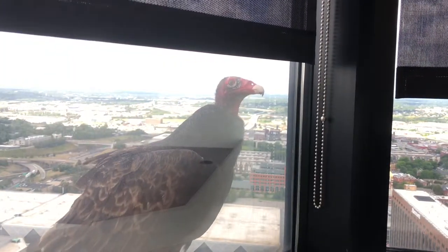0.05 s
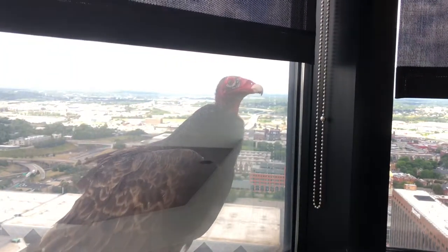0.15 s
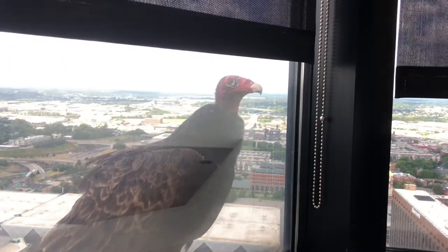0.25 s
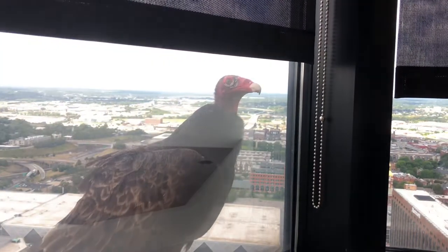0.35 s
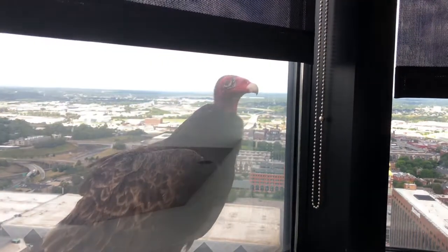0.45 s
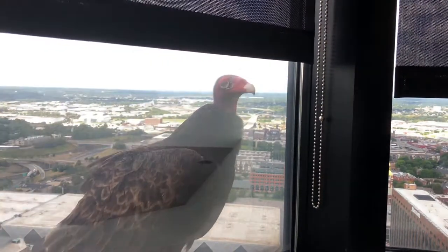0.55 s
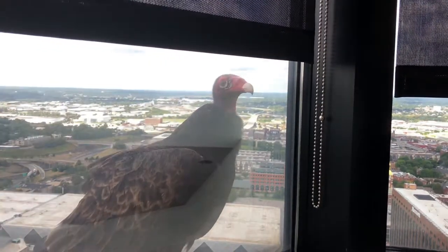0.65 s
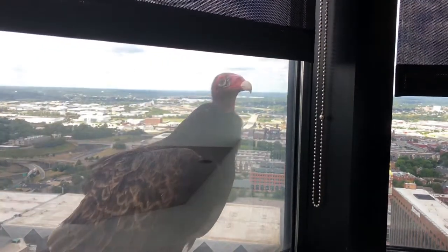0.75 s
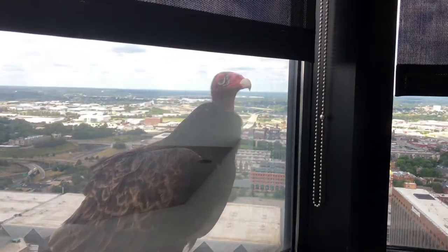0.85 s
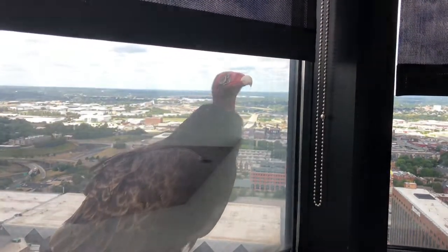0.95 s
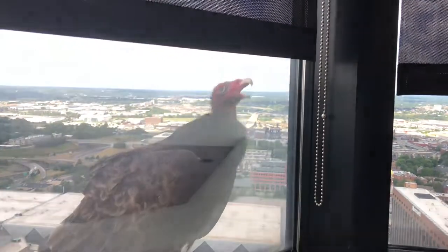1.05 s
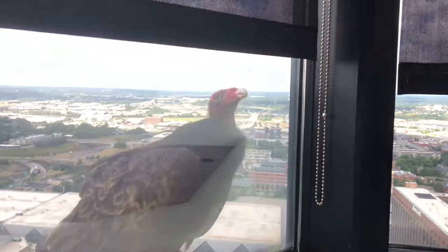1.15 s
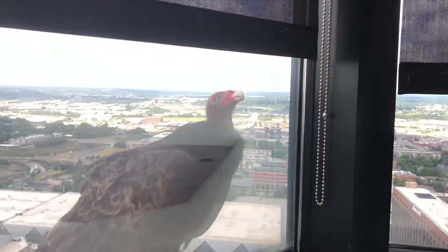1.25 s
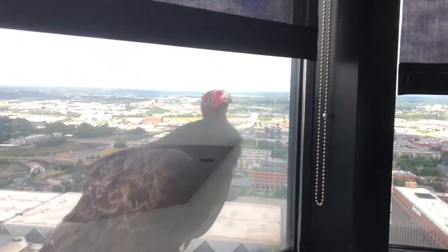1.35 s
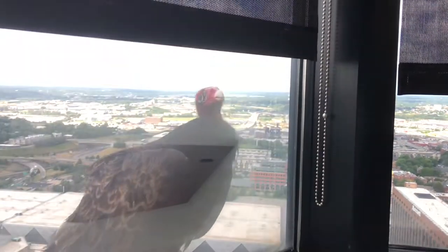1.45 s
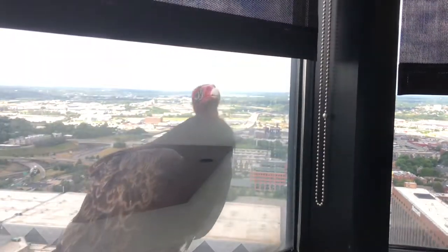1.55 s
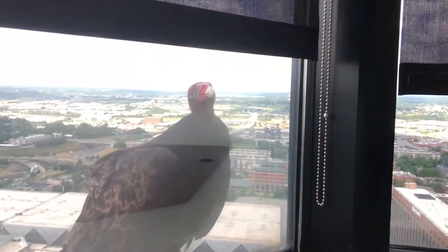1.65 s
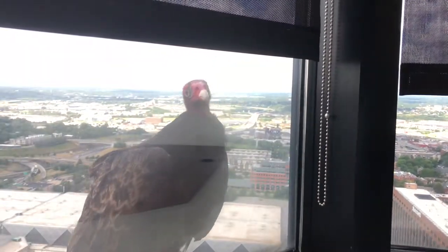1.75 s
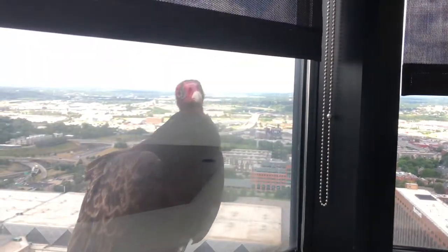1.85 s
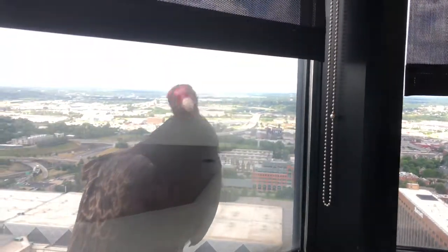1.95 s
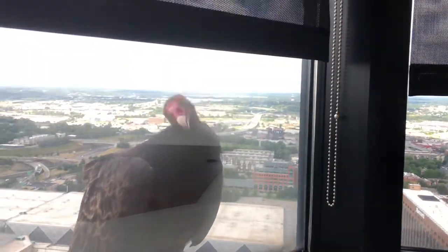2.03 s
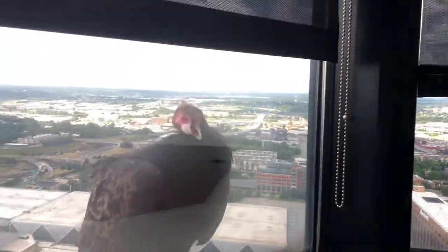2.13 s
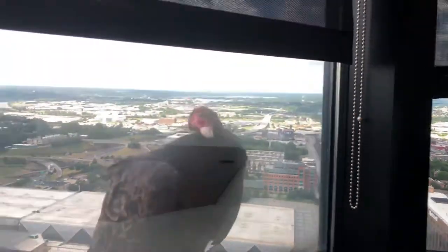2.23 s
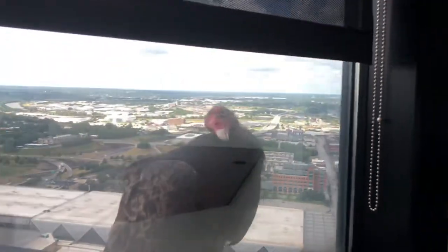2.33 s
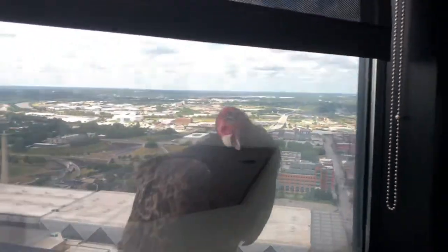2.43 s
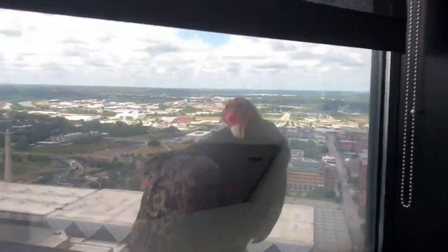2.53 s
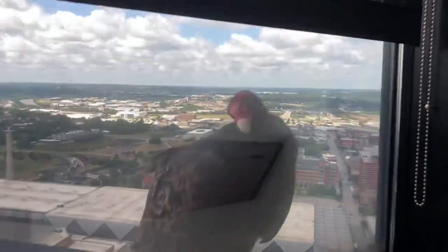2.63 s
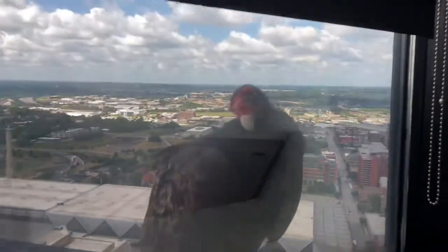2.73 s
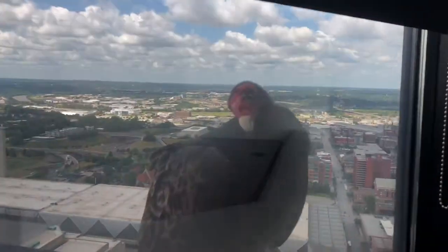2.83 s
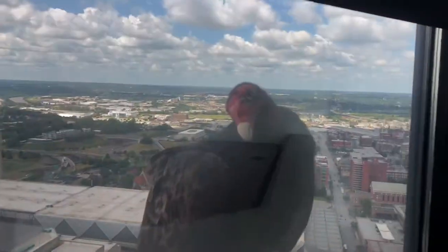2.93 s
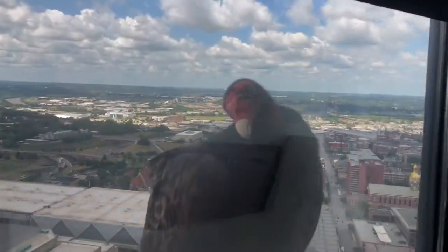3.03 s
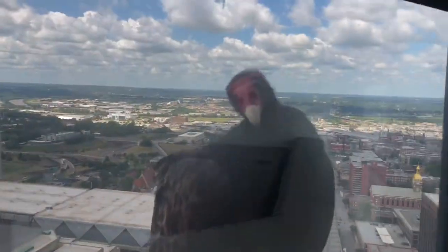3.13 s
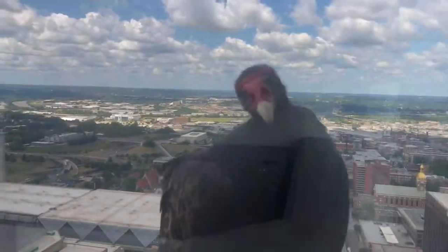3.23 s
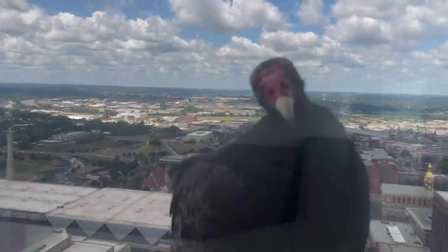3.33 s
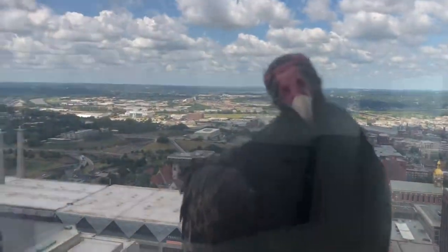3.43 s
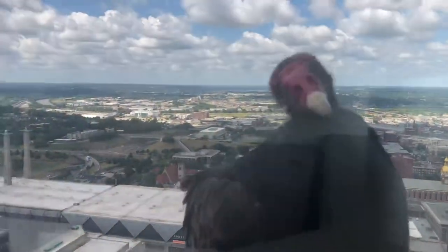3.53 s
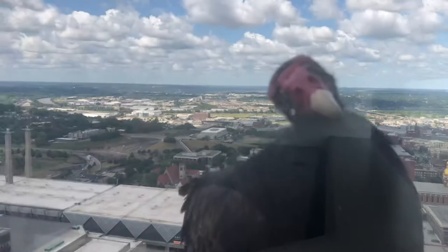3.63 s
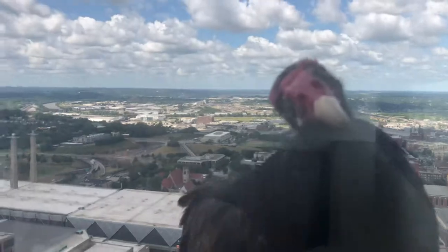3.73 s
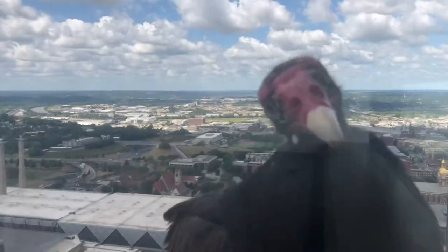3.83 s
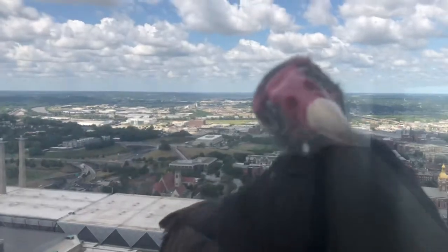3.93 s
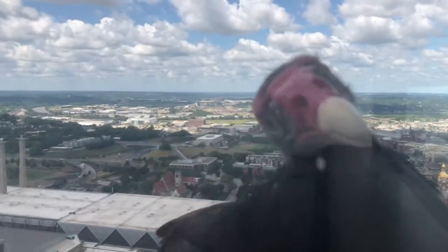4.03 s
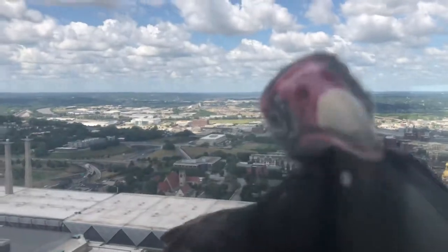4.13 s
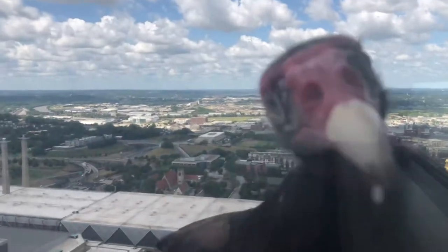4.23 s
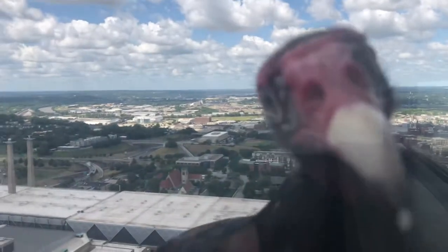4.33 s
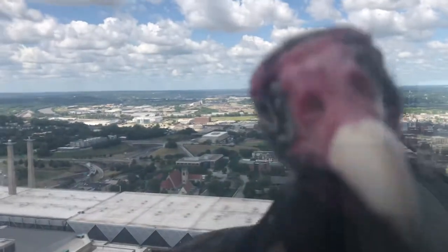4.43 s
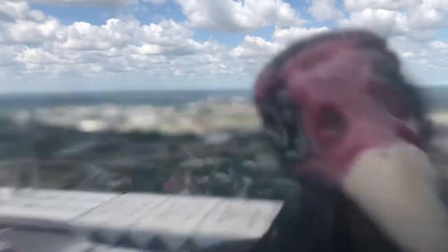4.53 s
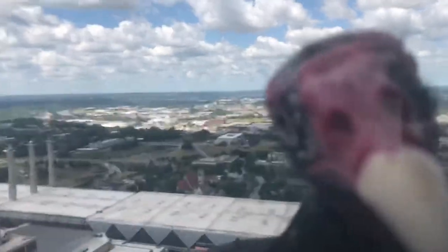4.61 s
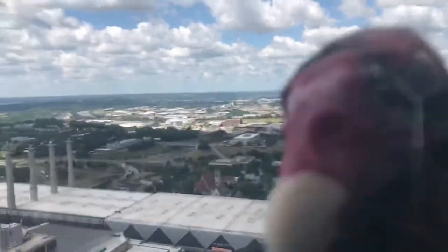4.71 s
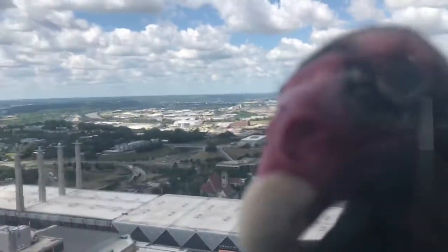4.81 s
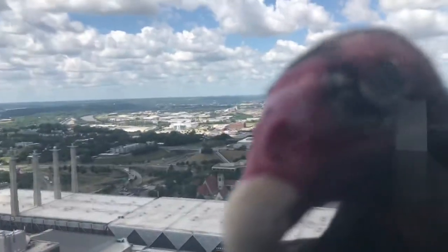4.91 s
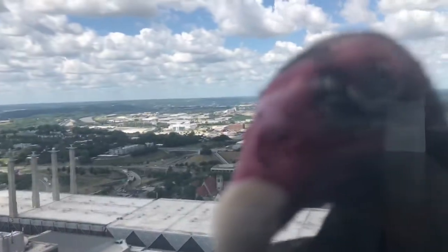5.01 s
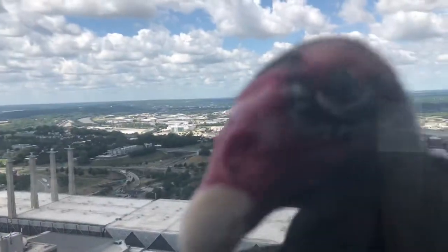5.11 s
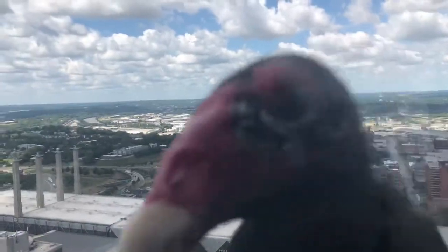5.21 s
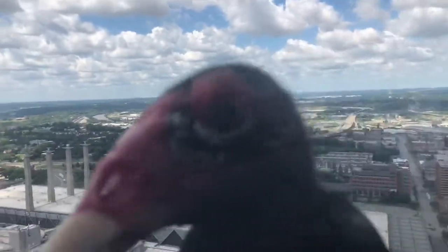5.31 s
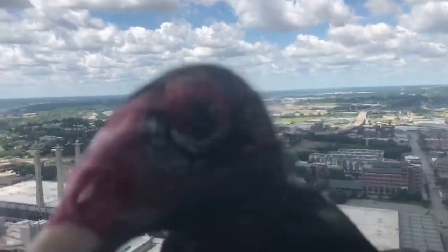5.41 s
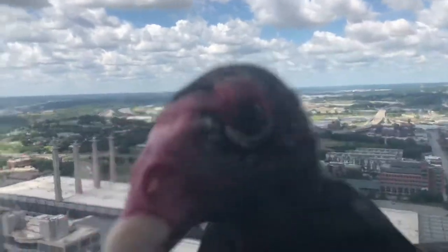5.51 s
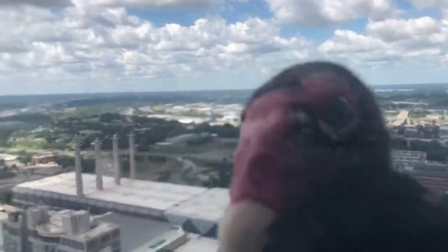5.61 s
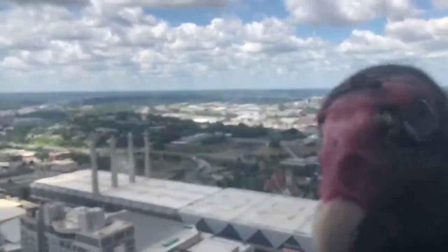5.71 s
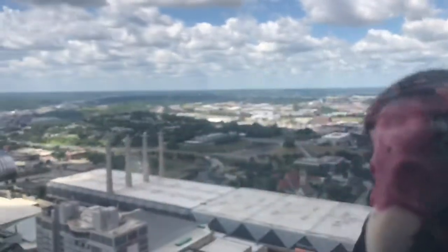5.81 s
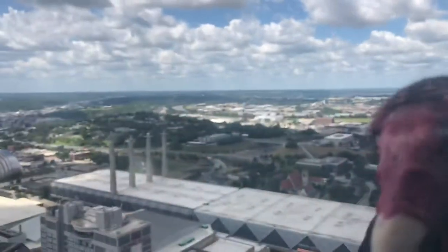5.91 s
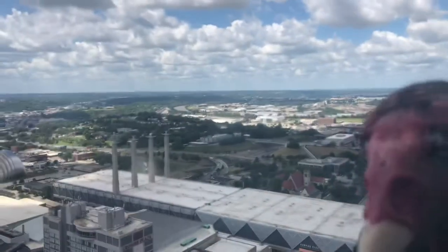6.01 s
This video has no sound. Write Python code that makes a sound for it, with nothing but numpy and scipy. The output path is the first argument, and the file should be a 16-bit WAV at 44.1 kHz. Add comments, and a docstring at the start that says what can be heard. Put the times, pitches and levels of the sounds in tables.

```python
"""A vulture on a ledge taps its beak on a large window, heard from just inside a quiet room.
Ventilation noise, a wavering fan tone and a faint whine run throughout, with a thin hiss that comes and goes.
Dull taps begin, and bright scuffs (both noise cracks with decaying rings) and hollow clacks with swelling modes
soon mingle with them. Late on, one hard knock by the microphone sweeps down in pitch, chatters in bright
noise bursts and rings."""
import sys
import numpy as np
from scipy import signal
from scipy.fft import irfft, next_fast_len
from scipy.io import wavfile
from scipy.ndimage import uniform_filter1d

SR = 44100
rng = np.random.default_rng(int(sys.argv[2]) if len(sys.argv) > 2 else 0)


def to_wav(sig):
    """Store sig (one row per channel, or 1-D mono) as 16-bit WAV at the path in sys.argv[1].

    Samples outside -1..1 are clipped; the rate is SR.
    """
    pcm = np.clip(np.atleast_2d(sig), -1, 1) * 32767
    pcm = np.round(pcm).astype(np.int16)
    wavfile.write(sys.argv[1], SR, pcm.T)  # frames by channels


N = 267246

# approach of the microphone to the window: [t/s, nearness 0-1]
NEARNESS = [(0, 0), (1.7, 0), (2.4, 0.68), (4.2, 0.9), (6.06, 0.98)]
# spectral shape of the ventilation noise: [f/Hz, relative density/dB per Hz]
AIR_COLOUR = [(15, -57.5), (25, -31), (64, -11), (107, -9.5), (140, -12.5), (164, -3.5), (297, -14),
              (331, -18), (445, -20.5), (495, -23.5), (567, -24.5), (1410, -38), (2490, -43.5),
              (3340, -46.5), (15500, -57.5)]
# level of the fan tone, uneven across the room: [t/s, level/dB]
FAN_LEVEL = [(0.0, -60.5), (2.75, -53.5), (3.48, -59), (4.47, -47.5), (4.98, -61), (5.33, -46.5),
             (6.06, -52.5)]
# stretches where the thin hiss stands out: [start t/s, end t/s]
HISS_SPANS = [(0.073, 0.913), (1.782, 2.815), (3.305, 4.707), (5.066, 5.246), (5.421, 5.693)]
# spectral shape of the thin hiss: [f/Hz, relative density/dB per Hz]
HISS_COLOUR = [(880, -7.5), (1500, -1.5), (1810, -3.5), (1930, -3), (3060, -3), (4350, -3), (15500, -12)]
# spectral shape of the whisper of air by the window: [f/Hz, relative level/dB]
WHISPER_COLOUR = [(300, -25.5), (420, -4), (455, 7.5), (500, -6.5), (800, -6), (1500, -3.5), (2450, 4.5),
                  (2900, -18.5), (8000, -39)]
# resonances and dips of the pane, applied in part to the taps, scuffs, clacks and the knock's tail: [f/Hz,
# width/Hz, lift/dB]
PANE = [(215, 31, 15.5), (383, 8, 2.5), (520, 6.7, 4), (572, 14, 10), (746.4, 16, 1.5), (1044, 120, 3.5),
        (1329, 18, 6.5), (1560, 31, -3), (1770, 27, 7.5), (2416, 46, 15), (2650, 27, -4.5), (3250, 56, 4.5),
        (5150, 55, 8.5)]
# decay of pane and room: [f/Hz, time to fall 60 dB/s]
DECAY = [(100, 0.98), (300, 0.92), (600, 0.5), (1200, 0.33), (2500, 0.26), (5000, 0.37), (12000, 0.31)]
# dull taps: [t/s, relative level/dB, tilt/dB per octave, favoured resonance f/Hz, rise time constant/s]
TAPS = [ (1.095, -29, -2.8, 890, 0.0042), (1.132, -34.5, -3, 602, 0.0067), (1.985, -42.5, -3, 1090, 0.003),
        (2.121, -32.5, 0.2, 556, 0.0053), (2.533, -29.5, 0.7, 2150, 0.0015),
        (3.541, -52, 3.5, 1100, 0.0033), (3.626, -37.5, -2, 2310, 0.0029),
        (5.116, -54.5, -9.5, 185, 0.0016), ]
# spectral shape of a tap before its tilt: [f/Hz, relative level/dB]
TAP_COLOUR = [(60, -13), (180, 4), (260, 6), (400, 0.5), (600, 2.5), (1200, 0), (2200, -3), (3000, -11),
              (4200, -20.5), (9000, -44), (16000, -45)]
# scuffs and brushes: [t/s, relative level/dB, tilt/dB per octave, favoured resonance f/Hz, rise time constant/s]
SCUFFS = [ (1.824, -48.5, -4, 774, .011), (2.214, -33.5, -1.5, 716, 0.048), (2.303, -41.5, 0, 1320, 0.011),
          (2.356, -43, 1.5, 1730, 0.0091), (3.004, -47.5, 4, 2820, 0.035), (3.335, -43.5, -1.3, 890, 0.011),
          (3.375, -44.5, -0.5, 3770, 0.0037), (3.462, -42.5, -2, 705, .008),
          (3.686, -40, 2.5, 4070, 0.0076), (3.813, -30.5, -0.5, 777, 0.0044),
          (3.938, -43, -3.5, 2400, 0.0023), (4.117, -37, -0.6, 780, 0.0061), (4.206, -51, 4, 2400, 0.0036),
          (4.514, -39, -0.6, 2430, 0.0088), (4.750, -27, 0, 750, 0.0038), (4.954, -39, 0, 4100, .014),
          (5.414, -43.5, -2, 2270, 0.013), ]
# spectral shape of a scuff before its tilt: [f/Hz, relative level/dB]
SCUFF_COLOUR = [(60, -11), (250, 2.5), (700, 2.5), (2000, 0.5), (4200, -4.5), (9000, -17), (16000, -26)]
# hollow clacks: [t/s, relative level/dB, further level of the modes/dB]
CLACKS = [(2.357, -42, -7), (2.954, -47, -4.5), (4.459, -39.5, -5.5), (4.919, -44, -4), (5.386, -53.5, 1)]
# spectral shape of the clack's noise: [f/Hz, relative level/dB]
CLACK_COLOUR = [(200, -37.5), (650, 0.5), (1050, -5.5), (1250, 3), (1700, 3.5), (2100, -2), (2650, -21),
                (3100, -9), (4500, -23.5), (6500, -37.5), (15000, -53.5)]
# swelling modes of a clack: [f/Hz, relative level/dB, t of greatest strength/s]
CLACK_MODES = [(599, -5, 0.0092), (1260, -4, 0.015), (1600, 0, 0.0053), (1523, -1.5, 0.028),
               (3080, -15, 0.016)]
# pitch of the bending wave as it arrives: [t after the blow/s, f/Hz]
SWEEP = [(0, 6200), (.0001, 3500), (.00045, 1100), (.001, 790), (.0026, 560), (.0035, 250), (.009, 170),
         (.02, 92), (.05, 60)]
# spectral shape of the knock's diffuse tail: [f/Hz, relative level/dB]
KNOCK_TAIL_COLOUR = [(35, -25.5), (70, -12.5), (160, -9), (260, -10), (390, 1), (520, -9), (750, -2.5),
                     (1150, -9), (1700, -5.5), (3200, -11.5), (4500, -13.5), (7000, -26), (15500, -35.5)]
# modes that only the hard knock sets ringing: [f/Hz, relative level/dB, time to fall 60 dB/s]
KNOCK_MODES = [(383, 1, 0.33), (455, -6.5, .8), (617, 3, 0.22), (730, 7.5, .25), (1016, -17, .6),
               (1510, -6.5, 0.4), (2490, -10, .45), (2790, -15, 0.4), (3220, -10.5, 0.39),
               (5238, -14, 0.32)]
# rebounds after the hard knock: [t/s]
CHATTER_TIMES = [4.6219, 4.6305, 4.6404, 4.6515]
# spectral shape of the rebounds: [f/Hz, relative level/dB]
CHATTER_COLOUR = [(1000, -22), (3000, -9), (6000, -3), (9000, -12), (12000, -7), (14500, 1), (15600, 0),
                  (16500, -8), (17500, -25)]

KNOCK_S = 4.6159  # instant of the hard knock


def gain_of(db):
    """Logarithmic level: 20 dB is a factor of ten in amplitude."""
    return 10 ** (np.asarray(db) / 20)


def evened(x):
    """Normalisation to unit root-mean-square amplitude."""
    return x / np.sqrt(np.mean(x ** 2) + 1e-20)


def read(points, hz):
    """Linear interpolation of a table along a logarithmic frequency axis."""
    f, value = np.transpose(points)
    return np.interp(np.log(hz + 1), np.log(f + 1), value)


def add(mix, s, sound):
    """Superposition: a sound starting at s seconds sums into the mix."""
    part = mix[round(s * SR):][:len(sound)]
    part += sound[:len(part)]


def noise(colour, size, pane=0):
    """Noise as dense partials of random phase; pane scales how strongly the glass shapes their spectrum."""
    hz = np.fft.rfftfreq(size, 1 / SR)
    lift = sum(db / (1 + (2 * (hz - f) / width) ** 2) for f, width, db in PANE)
    height = gain_of(read(colour, hz) + pane * lift)
    phase = np.exp(2j * np.pi * rng.random(len(hz)))
    return irfft(height * phase, size) * np.sqrt(size)


def steady_noise(colour):
    """Stationary noise of unit level and a given spectrum over the whole scene."""
    return evened(noise(colour, size=next_fast_len(N))[:N])


def approach(far_db, gained_db):
    """Proximity: the gain of a background sound grows as the microphone nears the window."""
    nearness = np.interp(np.arange(N) / SR, *np.transpose(NEARNESS))
    return gain_of(far_db + gained_db * nearness)


def ventilation(fan_hz=136.3, waver=0.16, waver_hz=2):
    """Broadband flow noise with a fan tone whose amplitude and phase waver by slow random modulation."""
    t = np.arange(N) / SR
    air = steady_noise(AIR_COLOUR) * approach(far_db=-52, gained_db=3)
    drift = steady_noise([(waver_hz, 0), (4 * waver_hz, -40), (20 * waver_hz, -140)])
    modulation = 1 + waver * signal.hilbert(drift) / np.sqrt(2)
    tone = (modulation * np.exp(2j * np.pi * fan_hz * t)).real
    tone_level = gain_of(np.interp(t, *np.transpose(FAN_LEVEL)))
    return air + np.sqrt(2) * tone * tone_level


def hiss(hiss_db=-65, whine_hz=15235, whine_db=-91):
    """Gated noise makes a hiss that comes and goes, over a whisper of air and a sinusoidal electrical whine."""
    t = np.arange(N) / SR
    level = gain_of(hiss_db) * sum((t > start) & (t < end) for start, end in HISS_SPANS)
    smooth_level = uniform_filter1d(level, size=300)
    thin = smooth_level * steady_noise(HISS_COLOUR)
    whisper = approach(far_db=-89, gained_db=19) * steady_noise(WHISPER_COLOUR)
    whine = gain_of(whine_db) * np.sin(2 * np.pi * whine_hz * t)
    return thin + whisper + whine


def die_away(x):
    """Exponential decay: every band fades at the rate of pane and room."""
    hz, t, z = signal.stft(x, SR, nperseg=256)
    z = z * gain_of(-60 * t / read(DECAY, hz)[:, None])
    return signal.istft(z, SR, nperseg=256)[1][:len(x)]


def clumps(depth_db):
    """Echo density: echoes bunch unevenly, a few milliseconds at a time."""
    fluctuation = uniform_filter1d(rng.standard_normal(SR), size=110)
    return gain_of(depth_db * evened(fluctuation))


def strike(colour, level_db, tilt_db, spot_hz, rise_s, crack=6.0, crack_hz=2400, favour=2.4, clump_db=1.16):
    """Impact excitation: a brief crack and diffuse ring, tilted in spectrum, plus the struck spot's own note."""
    t = np.arange(SR) / SR
    tilted = [(hz, db + tilt_db * np.log2(hz / 1000)) for hz, db in colour]  # pivots at 1 kHz
    ring = noise(tilted, size=SR, pane=0.41)
    spot = signal.lfilter(*signal.iirpeak(spot_hz, 12, SR), ring) * np.exp(-t / 0.06)
    # the instant of contact is brightest
    treble = signal.lfilter(*signal.butter(2, crack_hz, "high", fs=SR), ring)
    edge = treble * np.exp(-t / 0.0028)
    blow = (1 - np.exp(-t / rise_s)) * (1 + 0.49 * np.exp(-t / 0.0046))  # onset with early direct sound
    body = die_away(ring + favour * spot + crack * edge)
    return gain_of(level_db) * body * clumps(clump_db) * blow


def taps(level_db=-1):
    """Impulsive excitation: quick, dull blows ring the pane and the room."""
    out = np.zeros(N)
    for s, db, tilt_db, spot_hz, rise_s in TAPS:
        tap = strike(TAP_COLOUR, level_db + db, tilt_db, spot_hz, rise_s,
                     crack=6.6, crack_hz=1810, favour=2.9, clump_db=0.2)
        add(out, s, tap)
    return out


def scuffs(level_db=-1):
    """Glancing contact: most touches swell more slowly than taps, and their spectrum holds more treble."""
    out = np.zeros(N)
    for s, db, tilt_db, spot_hz, rise_s in SCUFFS:
        add(out, s, strike(SCUFF_COLOUR, level_db + db, tilt_db, spot_hz, rise_s))
    return out


def clacks(wash_db=-2, modes_db=-1, fade_s=0.14, snap=0.096, snap_s=0.0026, clump_db=3.0, swell=3.2):
    """Modal superposition: a decaying noise click joins modes that each swell to a peak, then fade."""
    out, t = np.zeros(N), np.arange(SR) / SR
    modes = np.zeros(SR)
    for hz, db, peak_s in CLACK_MODES:
        envelope = (t / peak_s * np.exp(1 - t / peak_s)) ** swell
        modes += gain_of(db) * np.sin(2 * np.pi * hz * t) * envelope
    for s, db, ring_db in CLACKS:
        wash = die_away(evened(noise(CLACK_COLOUR, size=SR, pane=0.82)))
        wash *= np.exp(-t / fade_s) * (1 + snap * np.exp(-t / snap_s))
        ring = gain_of(modes_db + ring_db) * modes * clumps(clump_db)
        add(out, s, gain_of(db) * (gain_of(wash_db) * wash + ring))
    return out


def knock(level_db=-1.0, thump_db=-13, thump_s=0.014, boom_hz=62, boom_db=-32, boom_s=0.011):
    """Dispersion: short bending waves outrun long ones in glass, so the blow sweeps down and ends in a thump."""
    t, out = np.arange(SR // 4) / SR, np.zeros(N)
    since, pitch = np.transpose(SWEEP)
    sweep_hz = np.exp(np.interp(t, since, np.log(pitch)))
    sweep = np.sin(2 * np.pi * np.cumsum(sweep_hz) / SR)
    contact = 1 - np.exp(-t / 0.00005)
    crack = 1 / (1 + (t / 0.0039) ** 5)
    thump = gain_of(thump_db) * np.exp(-(t / thump_s) ** 2 / 2)
    envelope = contact * (crack + (1 - crack) * thump)
    # the whole pane flexes
    boom = gain_of(boom_db) * np.sin(2 * np.pi * boom_hz * t) * t / boom_s * np.exp(1 - t / boom_s)
    add(out, KNOCK_S, gain_of(level_db) * sweep * envelope + boom)
    return out


def knock_ring(tail_db=-23.5, modes_db=-31, build_s=0.024, early=0.24, pane=0.63, clump_db=1.5):
    """Reverberation: returns from frame and walls build a diffuse tail in which a few pane modes stand out."""
    t, out = np.arange(SR) / SR, np.zeros(N)
    tail = die_away(evened(noise(KNOCK_TAIL_COLOUR, size=SR, pane=pane)))
    tail *= gain_of(tail_db) * clumps(clump_db)
    tail_build = 1 - (1 - early) * np.exp(-(t / build_s) ** 2)
    modes = np.zeros(SR)
    for hz, db, t60 in KNOCK_MODES:
        modes += gain_of(modes_db + db - 60 * t / t60) * np.sin(2 * np.pi * hz * t)
    add(out, KNOCK_S, tail * tail_build + modes * (1 - np.exp(-t / build_s)))
    return out


def chatter(first_db=-15, loss_db=5, width_s=0.00031):
    """Contact loss: tiny, very bright rebounds, Gaussian bursts of noise each weaker than the last."""
    t, bursts = np.arange(N) / SR, np.zeros(N)
    for k, s in enumerate(CHATTER_TIMES):
        bursts += gain_of(first_db - k * loss_db) * np.exp(-((t - s) / width_s) ** 2 / 2)
    return bursts * steady_noise(CHATTER_COLOUR)


def scene():
    """Linear superposition of the room's background and the beak on the glass."""
    background = ventilation() + hiss()
    touches = taps() + scuffs() + clacks()
    hard_knock = knock() + knock_ring() + chatter()
    return (background + touches + hard_knock)[None]


def record(dry):
    """Transduction: the small microphone loses deep bass, full scale caps the peaks, then treble is cut off."""
    heard = signal.lfilter(*signal.butter(2, 42, "high", fs=SR), dry)
    low_pass = signal.firwin(255, 16600, window=("kaiser", 8), fs=SR)
    return signal.oaconvolve(np.clip(heard, -1, 1), low_pass[None], "same")


dry = scene()
out = record(dry)
to_wav(out)
```